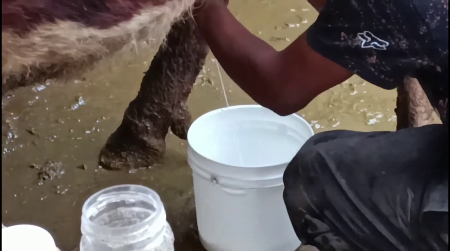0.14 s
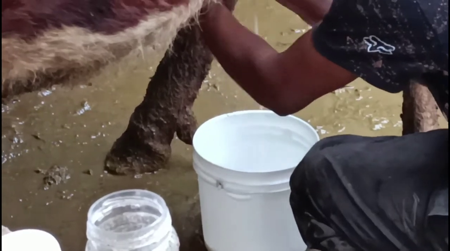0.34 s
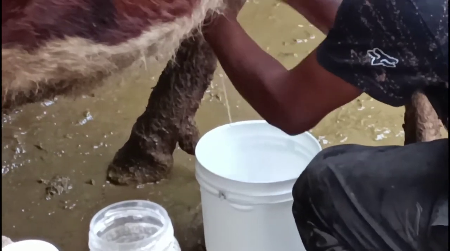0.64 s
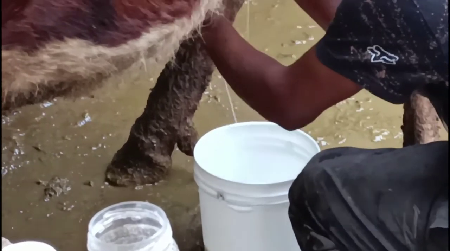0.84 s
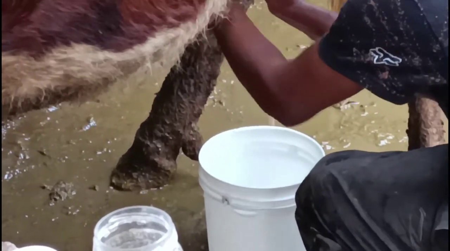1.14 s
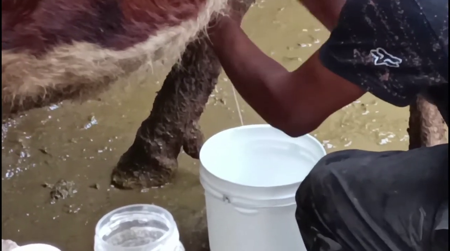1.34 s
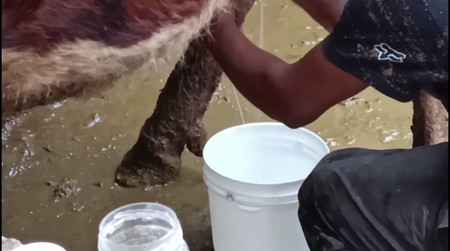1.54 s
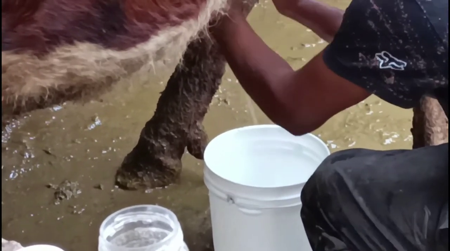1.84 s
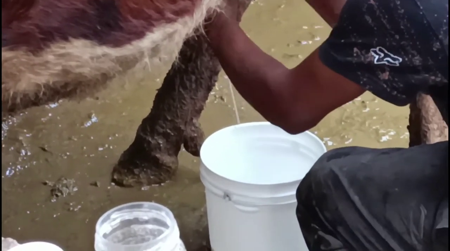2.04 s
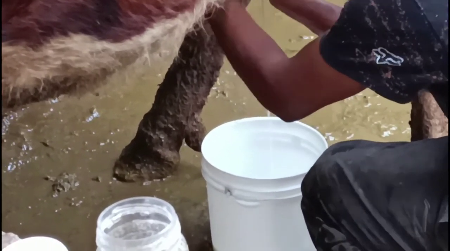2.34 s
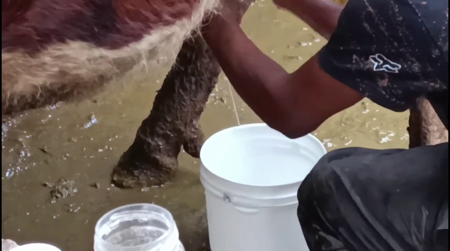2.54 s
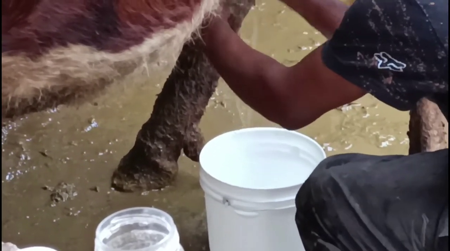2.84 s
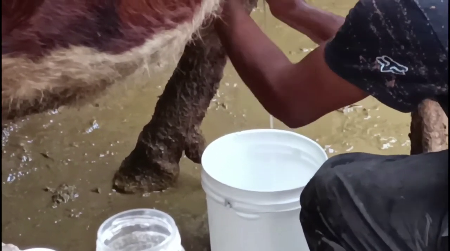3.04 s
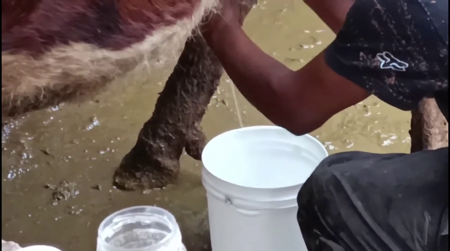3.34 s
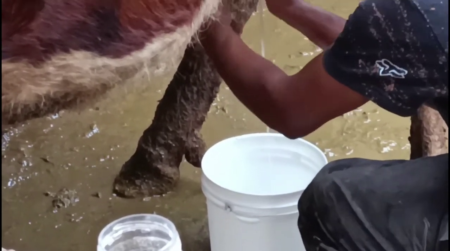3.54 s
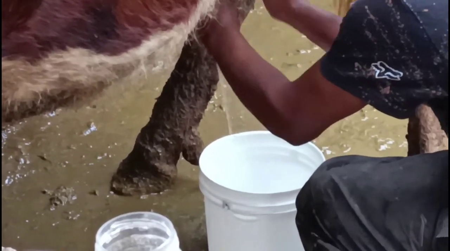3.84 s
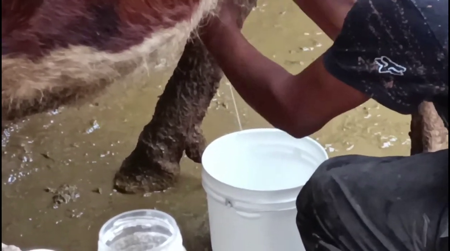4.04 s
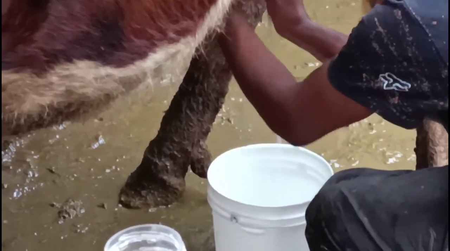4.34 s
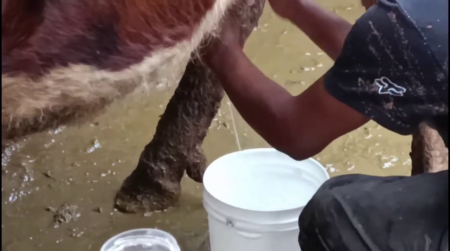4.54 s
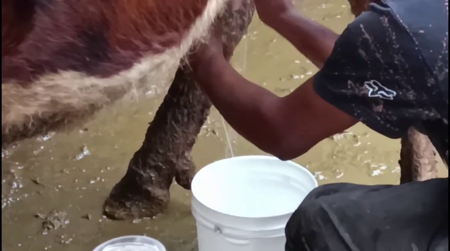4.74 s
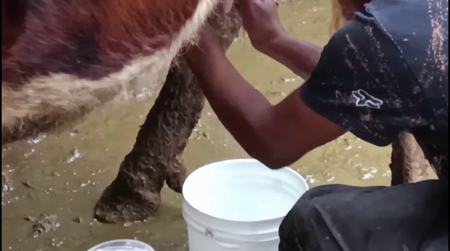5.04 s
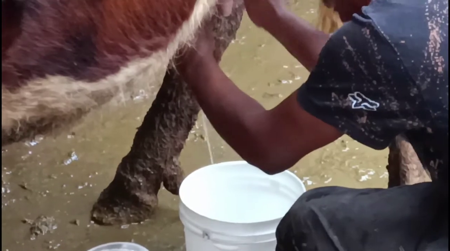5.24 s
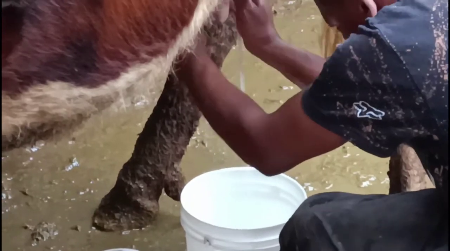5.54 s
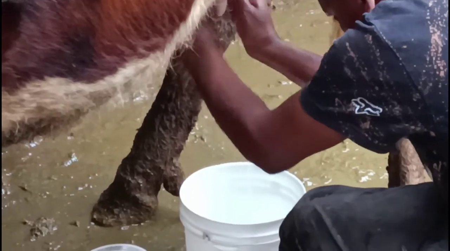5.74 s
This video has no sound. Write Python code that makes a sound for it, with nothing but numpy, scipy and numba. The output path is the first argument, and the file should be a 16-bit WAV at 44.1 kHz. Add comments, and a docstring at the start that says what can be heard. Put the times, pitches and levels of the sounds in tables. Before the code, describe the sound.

Steady, slightly uneven milk jets strike liquid already in a bucket, hissing and bubbling with a hollow plastic resonance. Stronger bursts alternate with weaker ones; the rhythm thins briefly after about three and a half seconds, then resumes with a full squirt. Small bright snaps and low plops are scattered throughout. Recorded near the bucket with a two-microphone phone in a quiet, open farm stall.

```python
"""In an open stall a cow is milked by hand into a plastic bucket, squirt after squirt, some in two or three pushes.
Each jet drives a cloud of small bubbles into the milk, spatters and fizzes in the froth and stirs deeper bubbles.
Lone drops snap on the plastic, big bubbles plop, and a low rumble of open air lies far behind.
Bucket wall and stall scatter the sound on its way to a phone with two microphone ports."""
import sys
import numpy as np
from scipy import signal
from scipy.fft import rfft, irfft
from scipy.io import wavfile
from scipy.ndimage import uniform_filter1d
from numba import njit

SR = 44100
rng = np.random.default_rng(int(sys.argv[2]) if len(sys.argv) > 2 else 0)


def inscribe(sig):
    """Save sig as 16-bit PCM at rate SR to the path in sys.argv[1].

    A 1-D sig is mono; a 2-D sig holds one channel per row.
    Samples are clipped to [-1, 1] before scaling.
    """
    pcm = np.round(np.clip(np.atleast_2d(sig).T, -1, 1) * 32767)
    wavfile.write(sys.argv[1], SR, pcm.astype(np.int16))


N = 259749
TIME = np.arange(N) / SR  # s
GRID = np.maximum(np.arange(4097) * SR / 8192, 1)  # Hz, the frequencies at which colours are drawn

# squeezes of a teat, some in two or three pushes; the hold counts from the start, levels are relative:
# start_s, attack_s, hold_s, plunge_level_db, spray_level_db, churn_level_db, bubble_pitch_hz, deep_bubble_pitch_hz
SQUEEZES = [(-0.034, 0.011, 0.152, -31.5, -33.5, -45.0, 2007, 742),
            (0.212, 0.049, 0.17, -29.5, -33.8, -43.5, 2000.0, 758),
            (0.491, 0.036, 0.081, -29, -32.7, -50.5, 2000, 485),
            (0.583, 0.026, 0.15, -31, -32.8, -45, 1863, 630),
            (0.842, 0.025, 0.14, -36.8, -37, -55, 2065, 645),
            (1.13, 0.018, 0.16, -35.5, -34.5, -48.5, 2015, 566),
            (1.325, 0.057, 0.13, -37, -34.4, -50.5, 1676, 680.0),
            (1.508, 0.055, 0.14, -30, -33, -44.5, 1872, 600),
            (1.794, 0.089, 0.12, -33, -29.5, -48.0, 1540, 583),
            (1.915, 0.04, 0.087, -39.5, -37.5, -48.5, 1830, 710),
            (2.129, 0.031, 0.13, -31, -33.5, -54.5, 1907, 518),
            (2.231, 0.041, 0.055, -37.5, -37, -47.5, 1784, 490),
            (2.435, 0.03, 0.028, -27.5, -33.5, -43.5, 1900, 472),
            (2.49, 0.052, 0.12, -40.5, -35.5, -42.5, 1930, 507),
            (2.623, 0.055, 0.078, -35.5, -36, -44.5, 1840, 700),
            (2.774, 0.034, 0.11, -36.5, -35, -47.5, 2115, 595),
            (3.081, 0.037, 0.12, -34, -33.5, -45, 1814, 553),
            (3.219, 0.039, 0.076, -33, -34.5, -45, 2198, 740),
            (3.371, 0.044, 0.034, -48, -52, -73, 2050.0, 477),
            (3.461, 0.034, 0.024, -54, -59.5, -83, 1996, 484),
            (3.717, 0.094, 0.23, -30, -32.5, -41.5, 1944, 654),
            (4.007, 0.04, 0.074, -38.4, -35, -62, 2110, 566),
            (4.139, 0.049, 0.12, -40, -38.5, -62, 1933, 616),
            (4.377, 0.037, 0.065, -41, -35.5, -52, 1895, 740),
            (4.439, 0.032, 0.14, -33, -32.5, -44, 2130, 725),
            (4.745, 0.081, 0.2, -40.5, -38, -58.5, 2077, 490),
            (5.018, 0.037, 0.096, -33.5, -34.5, -43.5, 1708, 482),
            (5.173, 0.037, 0.11, -40, -36, -47.2, 1857, 543),
            (5.361, 0.021, 0.14, -32, -35.0, -43, 2130, 660.0),
            (5.435, 0.073, 0.075, -36.5, -53, -47, 1933, 690),
            (5.524, 0.054, 0.047, -39.5, -40.5, -43.5, 1796, 615),
            (5.698, 0.05, 0.043, -32.5, -29, -45.0, 1713, 700),
            (5.775, 0.033, 0.094, -40.6, -41.5, -50, 1766, 518)]
# slugs of milk that open a crater, which sings briefly: start_s, length_s, pitch_hz, blow_db
SLUGS = [(0.002, 0.0067, 2060, 5.5), (0.246, 0.03, 2155, 0), (0.515, 0.047, 1950, -3.5),
         (1.136, 0.045, 2066, -1.5), (1.396, 0.022, 1455, 6), (1.849, 0.061, 1560, 0),
         (2.239, 0.034, 1867, -5), (2.444, 0.058, 1870, 5), (2.812, 0.025, 1977, 3.5),
         (3.111, 0.029, 1740, 7), (3.279, 0.013, 2580, 5.5), (3.786, 0.014, 2770, 0),
         (4.464, 0.043, 1870, -1.5), (4.534, 0.025, 2535, 2), (5.086, 0.027, 1470, -1),
         (5.363, 0.02, 1905, -7), (5.736, 0.007, 1680, 7)]
# colour of spatter, fizz and drops: frequency_hz, gain_db
SPRAY_COLOUR = [(300, -41), (850, -43), (1300, -12.5), (2200, -1), (3200, 0.5), (4500, 1), (8000, -0.5),
                (12000, -2.5), (15500, -9.5)]
# colour of the deep gurgle and the gulps: frequency_hz, gain_db
CHURN_COLOUR = [(100, -29), (260, -26), (340, 1.5), (450, -1.5), (620, -2), (850, 5), (1200, 9.5),
                (2500, -34)]


def squirts(plunge_db=3.43, spray_db=1.27, churn_db=-1.14):
    """The three sounds of the jets, all ringing the bucket's air: spray sags during a squeeze, plunge and churn swell."""
    # air resonances of the bucket, width where the dB gain has halved: pitch_hz, width_hz, gain_db
    bucket_modes = [(432, 44, 11.5), (741.6, 65, 8), (948, 5.1, 10), (1201, 8.8, 6.5), (1332, 50, 4.5),
                    (1835.5, 50, 8), (1960, 44, -2), (2200, 23, 0), (2390, 190, 1.5), (2660, 82, 4.5),
                    (3031, 45, 4)]
    cavity = bumps(bucket_modes)
    plunge_dbs, spray_dbs, churn_dbs, bubble_hz, deep_hz = np.transpose(SQUEEZES)[3:]

    pitch_hz = bubble_pitch(bubble_hz, rest_hz=2060, settle_s=0.099, glide_s=0.027)
    deep_pitch_hz = bubble_pitch(deep_hz, rest_hz=480, settle_s=0.13, glide_s=0.039)
    deep_pitch_hz = deep_pitch_hz * wander(rate_hz=12, depth_db=0.45)

    force = surges(per_s=110, fade_s=0.0063, steady=2.8)
    body = bucket_wall(plunge(cavity, pitch_hz) * force, ring_t60_s=0.06, wall_db=-2)
    hiss = bucket_wall(spray(cavity) * force, ring_t60_s=0.059, wall_db=-2)
    deep = churn(cavity, deep_pitch_hz) * wander(rate_hz=16, depth_db=2.15)

    body_level = flow(plunge_dbs + plunge_db, lag_s=0, trend_db_per_s=8.5,
                      release_s=0.064, linger_db=-16.5, linger_s=0.2)
    hiss_level = flow(spray_dbs + spray_db, lag_s=0, trend_db_per_s=-24,
                      release_s=0.13, linger_db=-12.0, linger_s=0.24)
    deep_level = flow(churn_dbs + churn_db, lag_s=0.015, trend_db_per_s=23,
                      release_s=0.087, linger_db=-18.0, linger_s=0.16)
    body = body * body_level * slug_blows(fade_share=0.7)
    hiss = hiss * np.hypot(hiss_level, splashes())
    return body + hiss + deep * deep_level


def plunge(cavity, pitch_hz, crater_db=2, slug_share=0.44, usual_share=0.26):
    """A wide cloud of bubbles, and a crater whose pitch wanders; when a slug lands the crater takes over."""
    # colour of the bubbles that a jet drives under: frequency_hz, gain_db
    plunge_colour = [(300, -22), (750, -28), (950, -10.5), (1200, 0), (1700, -4), (2400, 2.5), (2900, 0),
                     (4000, 0.5), (7000, 22), (12000, -41)]
    tone = slope(plunge_colour) + cavity
    start, length, slug_pitch_hz, _ = np.transpose(SLUGS)

    # the crater opens at once, stays for a moment and fills again
    opening = np.zeros(N)
    for s, d in zip(start, length):
        opening += np.interp(TIME, [s - .004, s, s + .6 * d, s + 1.4 * d], [0, 1, 1, 0])
    latest = np.maximum(np.searchsorted(start - .01, TIME) - 1, 0)
    usual_hz = pitch_hz * wander(rate_hz=18, depth_db=2.0)
    crater_hz = np.where(opening > 0, slug_pitch_hz[latest], usual_hz)

    def cloud_grains():
        grains = bubbles(pitch_hz, per_s=1500, octaves=1.467, cycles=34.0, scatter_db=1.5, glide=0.098)
        return even(colour(grains, tone), span_s=0.019)

    def crater_grains():
        grains = bubbles(crater_hz, per_s=400, octaves=0.371, cycles=119, scatter_db=4, glide=0.16)
        return even(colour(grains, tone), span_s=0.0064)

    cloud = pair(cloud_grains, shared=0.52)
    crater = pair(crater_grains, shared=0.83) * undb(crater_db * opening)
    share = np.clip(usual_share + slug_share * opening, 0, .95)  # crater's part of the power
    return np.sqrt(1 - share) * cloud + np.sqrt(share) * crater


def spray(cavity, fizz_db=-4, fizz_hz=7800):
    """Clicks of spatter, and the fizz of tiny froth bubbles whose typical pitch wanders."""
    tone = slope(SPRAY_COLOUR) + cavity
    pitch_hz = np.minimum(fizz_hz * wander(rate_hz=14, depth_db=2.0), 11500)

    def click_grains():
        return even(colour(crackle(per_s=3800, scatter_db=3.5), tone), span_s=0.056)

    def fizz_grains():
        grains = bubbles(pitch_hz, per_s=550, octaves=0.758, cycles=150, scatter_db=3.0, glide=0.077)
        return even(colour(grains, tone), span_s=0.064)

    return pair(click_grains, shared=0.42) + undb(fizz_db) * pair(fizz_grains, shared=0.46)


def churn(cavity, pitch_hz):
    """Larger bubbles deep in the milk gurgle through the hollow low notes of the bucket."""
    tone = slope(CHURN_COLOUR) + cavity

    def gurgle_grains():
        grains = bubbles(pitch_hz, per_s=300, octaves=0.9, cycles=27.0, scatter_db=-1.0, glide=0.04)
        return even(colour(grains, tone), span_s=0.036)

    return pair(gurgle_grains, shared=0.67)


def surges(per_s, fade_s, steady):
    """Beads of milk land at random; each lifts the force at once and then fades."""
    landings = (rng.random(N) < per_s / SR) * 1.
    power = signal.lfilter([1], [1, -np.exp(-1 / (fade_s * SR))], landings)
    return unit(np.sqrt(abs(steady) + power))


def bubble_pitch(jet_hz, rest_hz, settle_s, glide_s):
    """Each jet makes bubbles of its own size; once it slackens, the pitch settles to that of milk at rest."""
    start, _, hold = np.transpose(SQUEEZES)[:3]
    latest = np.maximum(np.searchsorted(start, TIME) - 1, 0)
    slack_s = np.maximum(TIME - (start + hold)[latest], 0)
    hz = rest_hz + (jet_hz[latest] - rest_hz) * np.exp(-(slack_s / settle_s) ** 2)
    return uniform_filter1d(hz, max(int(glide_s * SR), 1))


def flow(levels_db, lag_s, trend_db_per_s, release_s, linger_db, linger_s):
    """Each squeeze builds the jet, holds it with a sag or swell and lets go; stirred milk lingers. Powers add."""
    t = TIME[::32]  # a coarse clock is enough for levels
    power, linger = 0, undb(linger_db)
    for (start, attack, hold, *_), db in zip(SQUEEZES, levels_db):
        age = t - start - lag_s
        after = np.maximum(age - hold, 0)
        trend_db = trend_db_per_s * (np.clip(age, 0, hold) - hold / 2)
        held = np.clip(age / attack, 0, 1) * undb(db + trend_db)
        fading = (1 - linger) * np.exp(-after / release_s) + linger * np.exp(-after / linger_s)
        power = power + (held * fading) ** 2
    return np.interp(TIME, t, np.sqrt(power))


def slug_blows(fade_share):
    """Each slug abruptly lifts or lowers the plunge; the change fades over a share of the slug's length."""
    blow_db = np.zeros(N)
    for s, length, _, db in SLUGS:
        blow_db += db * (TIME >= s) * np.exp(-np.abs(TIME - s) / (fade_share * length))
    return undb(blow_db)


def splashes():
    """Level of brief splashes where a jet grazes the froth, each swelling and falling smoothly."""
    # splashes: middle_s, length_s, level_db
    graze_table = [(0.188, 0.085, -34), (0.33, 0.081, -31.5), (0.649, 0.046, -33.3), (0.807, 0.071, -36),
                   (0.962, 0.073, -33), (1.052, 0.056, -38), (1.185, 0.034, -29.5), (1.261, 0.076, -33),
                   (1.722, 0.042, -38), (1.804, 0.031, -33), (2.086, 0.059, -45), (2.206, 0.038, -32.1),
                   (2.588, 0.049, -31.5), (3.734, 0.057, -38), (4.19, 0.046, -39.5), (4.727, 0.043, -39.7),
                   (5.164, 0.094, -32), (5.56, 0.053, -30.5)]
    return sum(undb(db) * np.exp(-(2 * (TIME - s) / length) ** 2) for s, length, db in graze_table)


def drops(cycles=9, gain_db=1):
    """Lone drops hit the plastic, each a short bright snap made of a quickly damped sine."""
    # single drops, levels before gain and colour: start_s, level_db, pitch_hz
    drop_table = [(0.47, -16, 11000), (0.631, -12, 11100), (1.517, -10.5, 9500), (1.7982, -10.5, 6650),
                  (2.409, -14, 9900), (3.026, -17, 11000), (3.316, -17, 12000), (3.357, -17, 9500),
                  (4.183, -10.5, 9000), (4.567, -9, 11500), (4.719, -13, 9400), (5.5367, -13, 8830)]
    when, db, hz = np.transpose(drop_table).copy()
    snaps = ring(when, hz, np.full(len(when), float(cycles)), undb(db + gain_db), 0., N)
    return colour(snaps, slope(SPRAY_COLOUR))


def gulps(cycles=60, gain_db=2, glide=0.14, upper_ratio=1.4, upper_db=-7):
    """A big bubble closing in the milk gives a soft low plop, with a fainter, higher tone ringing beside it."""
    # large pockets of air, levels before gain and colour: start_s, level_db, pitch_hz
    gulp_table = [(1.637, -40, 437), (1.714, -39.5, 446), (2.284, -37.5, 399), (3.045, -49, 368),
                  (3.135, -45.5, 453), (3.486, -58, 420), (4.033, -40, 428), (4.856, -46, 398),
                  (5.119, -40.5, 505), (5.578, -45, 420)]
    when, db, hz = np.transpose(gulp_table).copy()
    length = np.full(len(when), float(cycles))
    big = ring(when, hz, length, undb(db), float(glide), N)
    upper = ring(when, hz * upper_ratio, length, undb(db + upper_db), float(glide), N)
    return undb(gain_db) * colour(big + upper, slope(CHURN_COLOUR))


def bucket_wall(both, ring_t60_s, wall_db, spot_s=.16):
    """Sound bounces inside the bucket; jets keep landing on new spots, each with its own pattern of echoes."""
    hop = int(spot_s * SR)
    fade = np.sin(np.pi * np.arange(2 * hop) / (2 * hop))  # overlapping pieces keep equal power
    padded = np.pad(both, ((0, 0), (hop, SR)))
    bounced = np.zeros_like(padded)
    for side in range(2):
        for first in range(0, N + hop, hop):
            piece = fade * padded[side, first:first + 2 * hop]
            piece = signal.fftconvolve(piece, echoes(ring_t60_s)[:hop])
            bounced[side, first:first + len(piece)] += piece
    mixed = both + undb(wall_db) * bounced[:, hop:hop + N]
    return mixed / np.sqrt(1 + undb(wall_db) ** 2)


def stall(both, port_lag_s=.0001, room_t60_s=0.24, room_db=-15):
    """The sound reaches the right port a little later; the open stall adds a short faint tail."""
    left, right = both
    direct = np.array([left, np.roll(right, int(round(port_lag_s * SR)))])
    tail = np.array([signal.fftconvolve(x, echoes(room_t60_s))[:N] for x in direct])
    return direct + undb(room_db) * tail


def yard(level_db=-55, side_db=-12):
    """Faint low rumble of the open air, coloured noise nearly the same on both sides."""
    # colour of the distant farmyard: frequency_hz, gain_db
    yard_colour = [(20, -26), (50, 2.5), (70, 2.5), (100, 0), (130, -3), (180, -6), (260, -8.5),
                   (500, -8.5), (1000, -26), (4000, -33), (15000, -10)]
    mid, side = (unit(colour(rng.standard_normal(N), slope(yard_colour))) for _ in range(2))
    rumble = mid + undb(side_db) * np.array([side, -side])
    return undb(level_db) * wander(rate_hz=6.1, depth_db=1.5) * rumble


@njit
def ring(start, hz, cycles, size, glide, count):
    """Damped sines that fall 60 dB in the given cycles while their pitch rises by the share glide."""
    out = np.zeros(count)
    for k in range(len(start)):
        first, length = int(start[k] * SR), int(cycles[k] * SR / hz[k]) + 2
        z = size[k] + 0j
        p = np.exp(2j * np.pi * hz[k] / SR - np.log(1000) / length)  # turn and decay per sample
        bend = np.exp(2j * np.pi * hz[k] / SR * glide / length)
        for i in range(first, min(first + length, count)):
            out[i] += z.imag
            z *= p
            p *= bend
    return out


def bubbles(pitch_hz, per_s, octaves, cycles, scatter_db, glide):
    """A cloud of bubbles of unequal size, each ringing around the typical pitch."""
    draw = rng.random((40000, 4))[:int(per_s * N / SR)]
    when = draw[:, 0] * (N - 1) / SR
    hz = np.interp(when, TIME, pitch_hz) * 2 ** (octaves * (draw[:, 1] + draw[:, 2] - 1))
    size = undb(-scatter_db * np.log(np.maximum(draw[:, 3], .005)))
    return ring(when, hz, np.full(len(hz), float(cycles)), size, float(glide), N)


def crackle(per_s, scatter_db):
    """Tiny bursts of froth: many faint ones and a few sharp ones."""
    happens = rng.random(N) < per_s / SR
    size = undb(scatter_db * np.minimum(rng.exponential(size=N), 5))
    return happens * size * rng.choice([-1, 1], N)


def pair(draw, shared):
    """Grains at two ports: a share of the power arrives alike at both, the rest is scattered around the bucket."""
    shared = np.clip(shared, 0, 1)
    return np.sqrt(shared) * draw() + np.sqrt(1 - shared) * np.array([draw(), draw()])


def even(x, span_s):
    """Hold a stream of grains at rms 1 over the given span: a jet delivers its milk without gaps."""
    return x / np.sqrt(np.abs(uniform_filter1d(x ** 2, max(int(span_s * SR), 8))) + 1e-12)


def echoes(t60_s):
    """Dense dying reflections with unit energy."""
    t = TIME[:SR // 2]
    response = rng.standard_normal(len(t)) * 1000 ** (-t / t60_s)
    return response / np.sqrt(np.sum(response ** 2))


def wander(rate_hz, depth_db):
    """A factor that drifts around 1, heading for a new random level at the given rate."""
    return undb(depth_db * np.interp(TIME * rate_hz, np.arange(4000), rng.standard_normal(4000)))


def slope(points):
    """Gain in dB over frequency, joined through (Hz, dB) points."""
    hz, db = np.transpose(points)
    return np.interp(np.log(GRID), np.log(hz), db)


def bumps(modes):
    """Gain in dB over frequency from (Hz, width in Hz, dB) resonances and notches."""
    return sum(db * 2 ** -((2 * (GRID - hz) / width) ** 2) for hz, width, db in modes)


def colour(x, db):
    """Causal minimum-phase filter with the given gain, so that resonances ring after the blow."""
    cepstrum = irfft(db * np.log(10) / 20)
    half = len(cepstrum) // 2
    cepstrum[1:half] *= 2  # folding the cepstrum forward makes the filter causal
    cepstrum[half + 1:] = 0
    response = irfft(np.exp(rfft(cepstrum)))[:half]
    return signal.fftconvolve(x, response)[:N]


def undb(db):
    """Decibels to gain."""
    return 10 ** (np.asarray(db) / 20)


def unit(x):
    """Scale to rms 1."""
    return x / np.sqrt(np.mean(x ** 2))


def scene():
    """The bucket in the stall, over the quiet yard."""
    return stall(squirts() + drops() + gulps()) + yard()


def record(dry, top_hz=15650):
    """Each microphone port colours the treble in its own way; a steep low-pass cuts the top."""
    # resonances and notches of each port, width where the dB gain has halved: frequency_hz, width_hz, gain_db
    left_port = [(2350, 2600, 2), (6510, 1960, -24.5), (9170, 950, 5.5), (10430, 2000, 3.5),
                 (15300, 1300, -34)]
    right_port = [(5200, 1400, 0), (6580, 720, 5.5), (9480, 2020, -18), (14720, 2900, 8)]
    ports = [colour(x, bumps(port)) for x, port in zip(dry, (left_port, right_port))]
    low_pass = signal.ellip(10, .2, 80, top_hz, fs=SR, output="sos")
    return signal.sosfilt(low_pass, ports)


dry = scene()
out = record(dry)
inscribe(out)
```